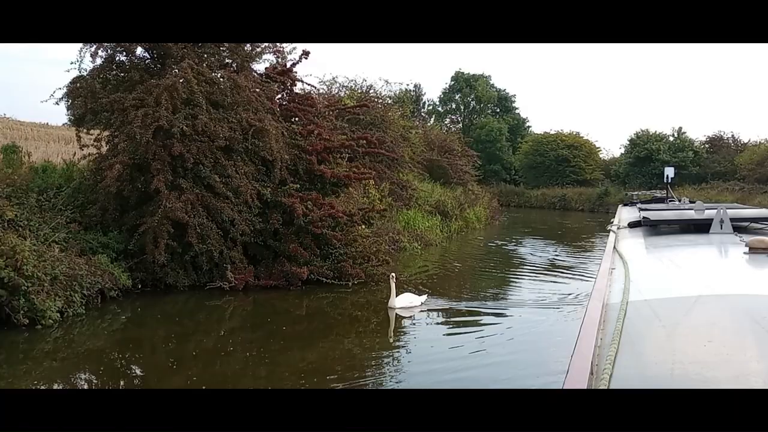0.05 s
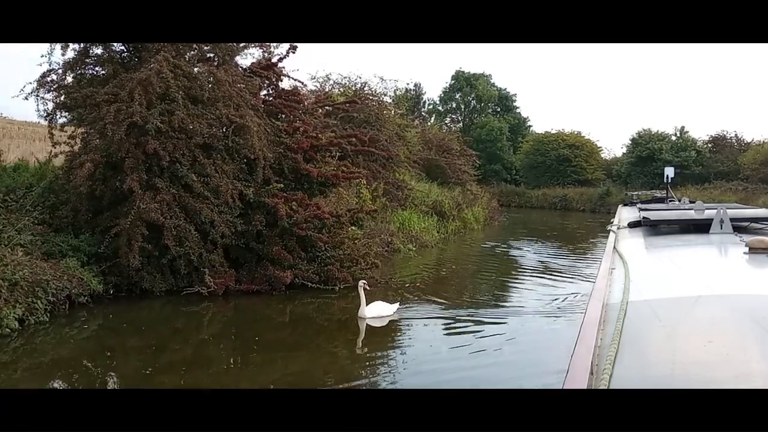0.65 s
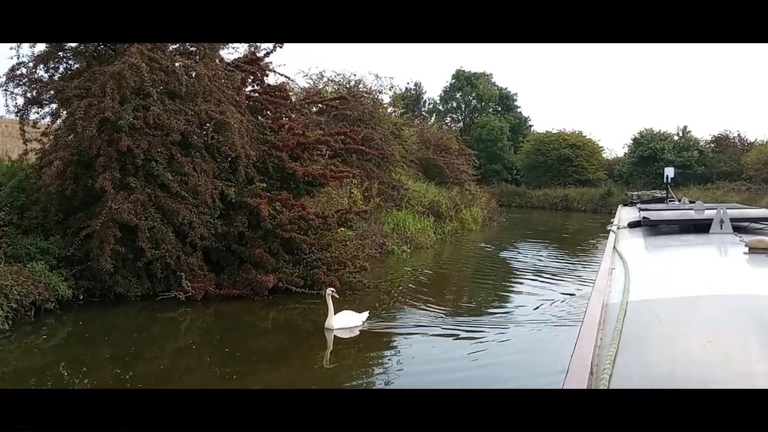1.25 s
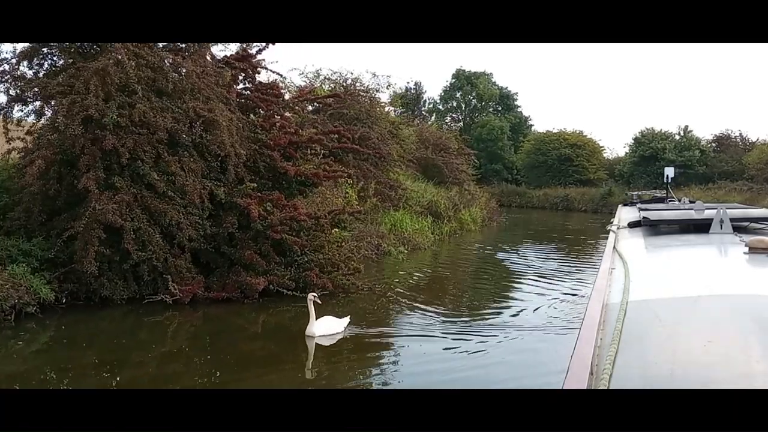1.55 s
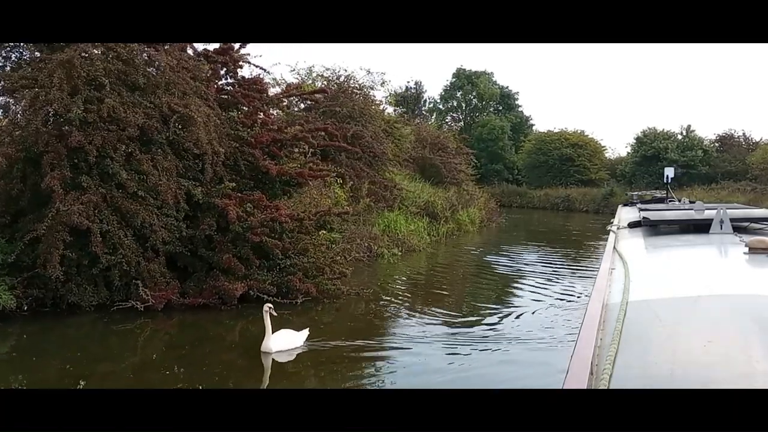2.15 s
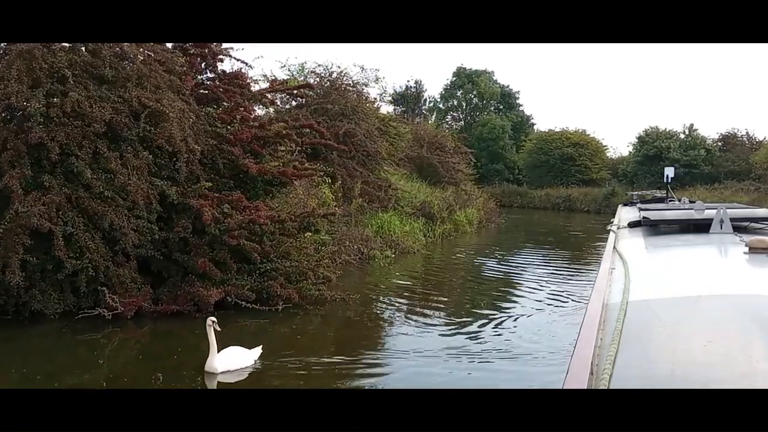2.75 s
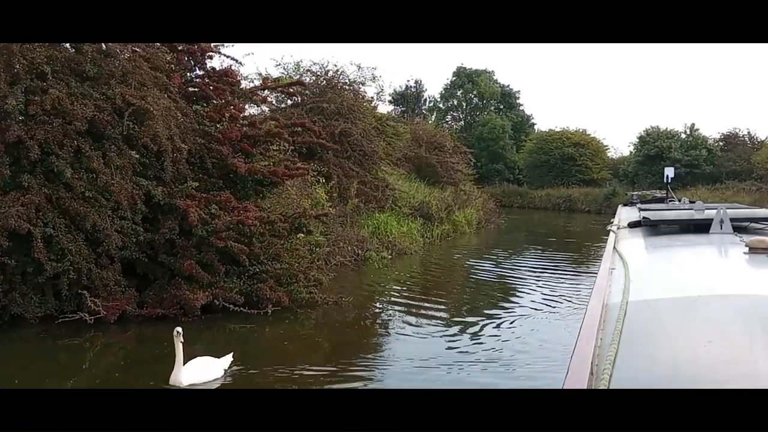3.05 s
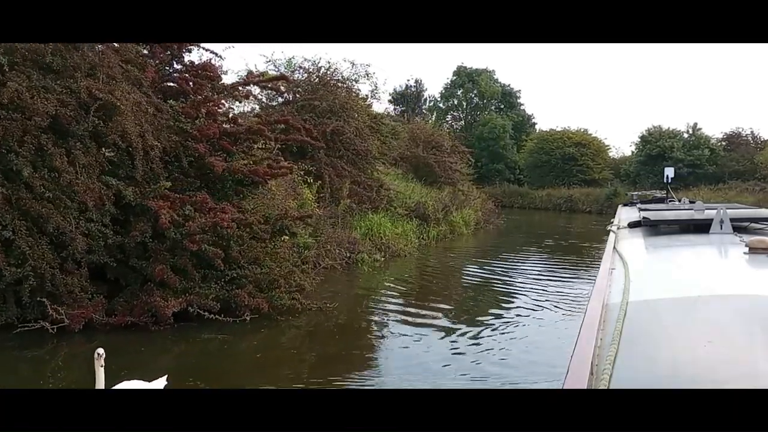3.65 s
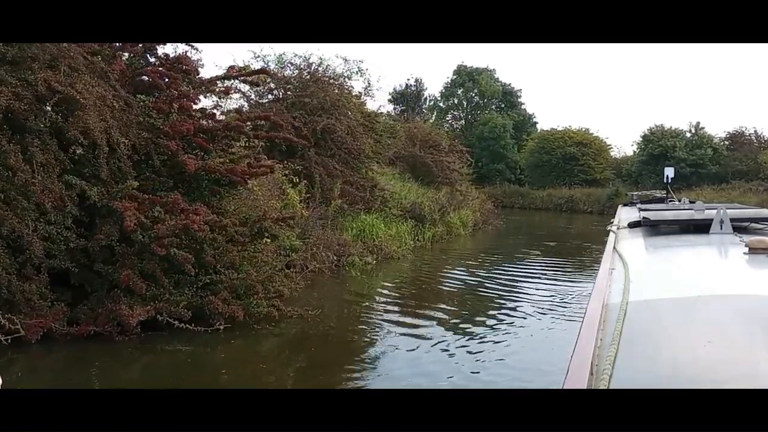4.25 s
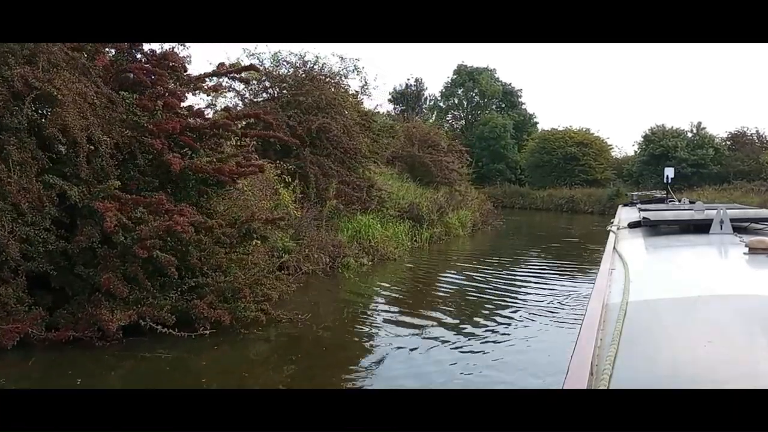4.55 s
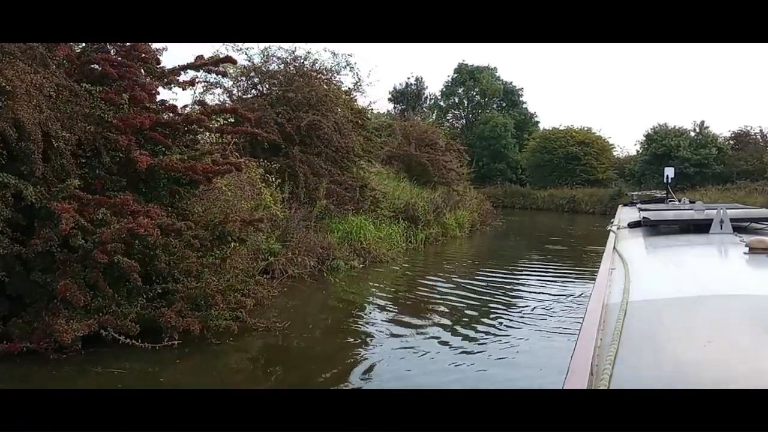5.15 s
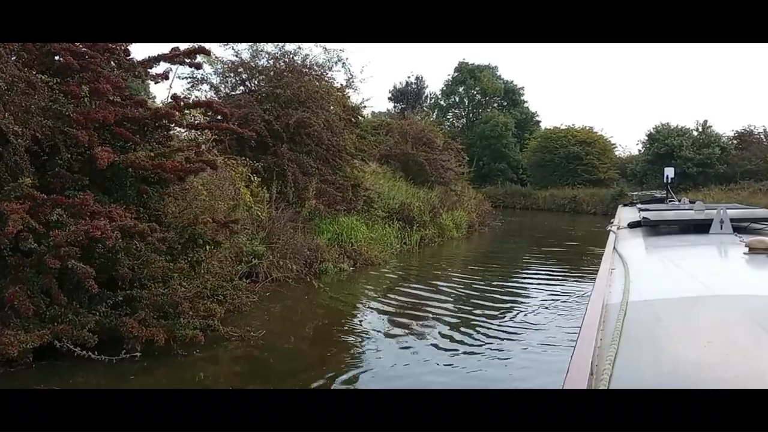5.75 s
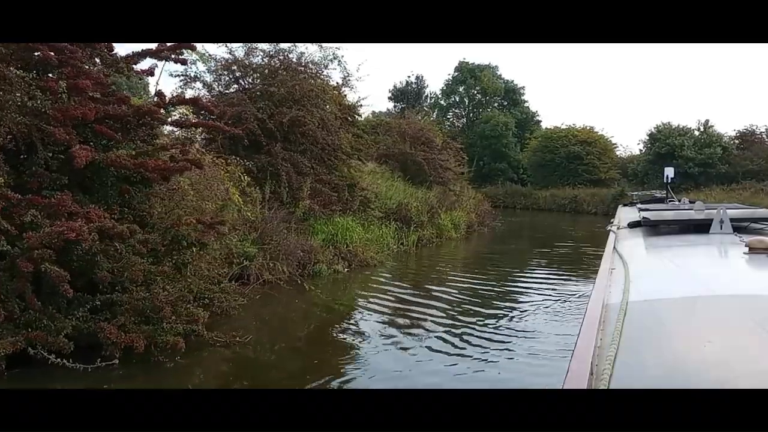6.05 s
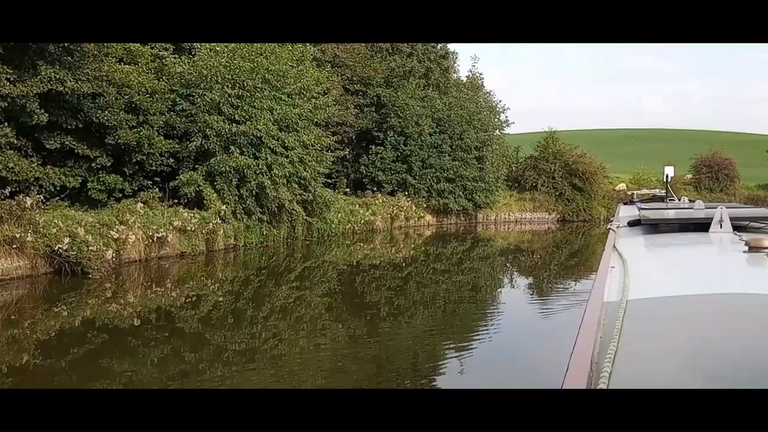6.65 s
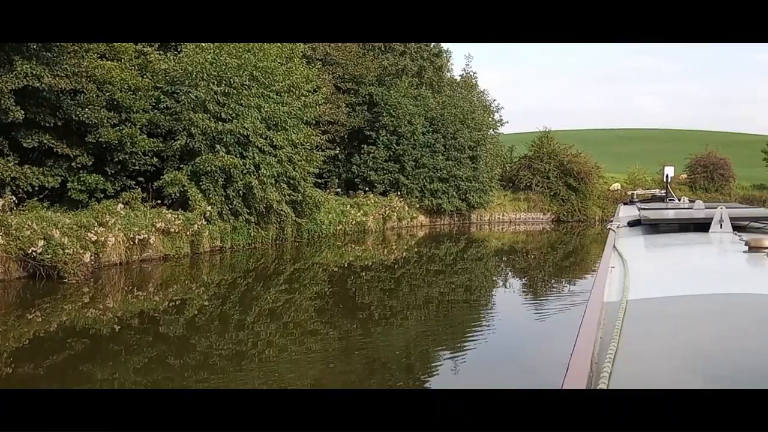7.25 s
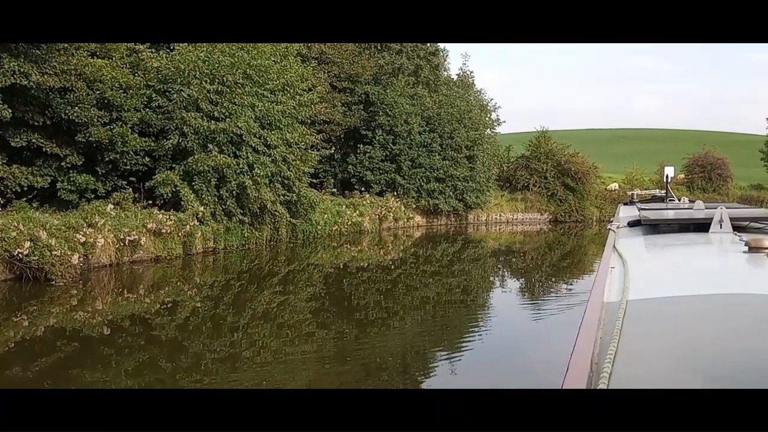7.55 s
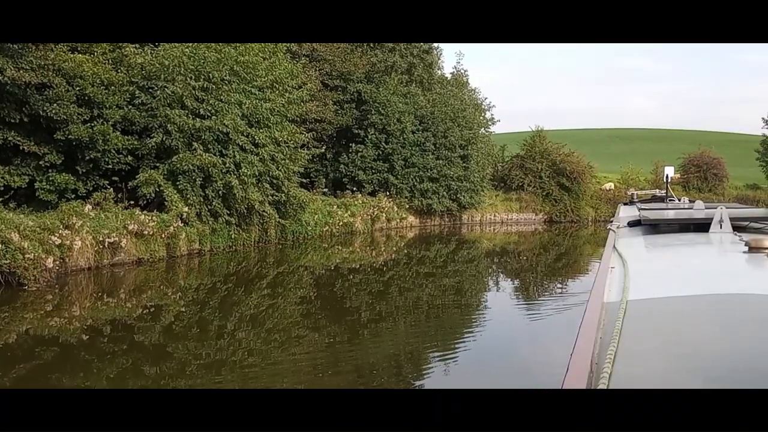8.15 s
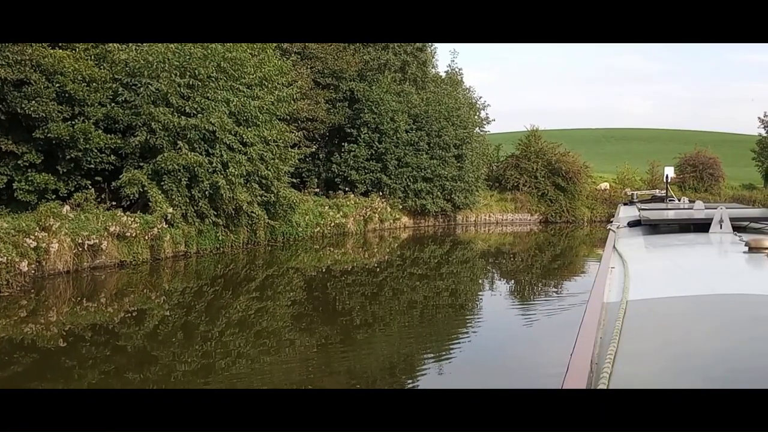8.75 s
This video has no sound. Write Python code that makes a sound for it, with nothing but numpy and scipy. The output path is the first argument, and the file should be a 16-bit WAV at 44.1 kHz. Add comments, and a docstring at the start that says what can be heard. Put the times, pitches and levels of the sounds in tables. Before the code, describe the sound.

Steady diesel chugging and rattling aboard a narrowboat, with light clinks and faint birdsong, cutting out briefly and fading back in.

```python
"""A narrowboat cruises a quiet canal, heard from the stern, its four-cylinder diesel at about 915 rpm.
From the start the exhaust and steel hull drone, pistons slap and clatter under the deck boards and a loose
fitting buzzes once a crank turn, over a faint water hiss. From 2 to 3.3 s metal clinks three times on deck,
and a small bird chirps once. At 6.6 s everything drops out, then fades back in with the exhaust a little
louder and the clatter brighter; the bird trills and chirps again, and the engine chugs on."""
import sys
import numpy as np
from scipy import signal
from scipy.fft import rfft, irfft, next_fast_len
from scipy.io import wavfile

SR = 44100
rng = np.random.default_rng(int(sys.argv[2]) if len(sys.argv) > 2 else 0)


def output_pcm(signal):
    """Save a mono or channel-first signal as 16-bit PCM at the path in sys.argv[1].

    Samples are clipped to [-1, 1] before scaling.
    """
    pcm = np.clip(np.atleast_2d(signal).T, -1, 1) * 32767
    wavfile.write(sys.argv[1], SR, np.round(pcm).astype(np.int16))


N = 392490
T = np.arange(N) / SR
HZ = np.fft.rfftfreq(next_fast_len(N), 1 / SR)
GAP_START_S, GAP_END_S = 6.598, 6.668
AFTER_GAP = T > GAP_END_S


# engine speed, hunting slightly on the governor: t/s, speed/rpm
CRANK_SPEED = [(0.0, 916.1), (0.5, 908.3), (0.9, 918.2), (2.05, 909.9), (2.6, 916.2), (3.35, 911.4),
               (3.95, 919.7), (4.5, 909.9), (5.05, 914.9), (5.6, 912.5), (6.15, 916.6), (8.1, 917.8),
               (8.6, 913.9)]
CYCLE_HZ = np.mean(CRANK_SPEED, axis=0)[1] / 120
def engine_cycle():
    """Count four-stroke cycles, two crank turns each; whole numbers fall on the heavy thump."""
    rpm = np.interp(T, *np.transpose(CRANK_SPEED))
    offset = np.interp(T, [GAP_START_S, GAP_END_S], [.407, .637])  # the beat skips ahead in the gap
    return np.cumsum(rpm / 120) / SR + offset


# exhaust note, from the 2nd multiple of the firing rate up: level/dB
EXHAUST_HARMONICS = [-53.5, -40, -48, -56, -66.5, -61, -72, -74, -62]
def exhaust_lines(count, lift_db=1.33):
    """Four firings a cycle hum on every fourth order; one row before the gap, a louder one after."""
    lines = np.zeros(count)
    lines[:4 * len(EXHAUST_HARMONICS):4] = amp(EXHAUST_HARMONICS)
    return np.array([lines, lines * amp(lift_db)])


# hull resonances: f/Hz, width/Hz, level before the gap/dB, level after/dB
HULL_MODES = [(134.4, 7, -61, -58), (170.3, 11.2, -51.5, -51.5), (188.5, 9.2, -53.5, -53.5),
              (213.7, 9, -54.5, -56), (227.2, 6.7, -55.5, -58), (319.3, 6.2, -50.5, -48.5),
              (351, 7.6, -60, -54.5), (396, 4.5, -62, -59.5), (426.5, 5.3, -69.5, -73),
              (479.2, 6.6, -63.5, -64.5)]
def hull_lines(hz):
    """The steel hull picks tones out of the engine's shaking; rows for before and after the gap."""
    return sum(amp(db)[:, None] * resonance(hz, centre, width) for centre, width, *db in HULL_MODES)


def drone(cycle, waver_db=-69, waver_hz=3):
    """One cylinder thumps hardest; the exhaust hums and the hull rings after that beat."""
    orders = np.arange(8, 65)  # multiples of the cycle rate
    hz = orders * CYCLE_HZ
    exhaust, hull = exhaust_lines(len(orders)), hull_lines(hz)
    before, after = np.hypot(exhaust, np.abs(hull)) * np.exp(1j * np.angle(exhaust + hull))
    waver = amp(waver_db) / np.hypot(np.abs(before), amp(waver_db))  # faint tones waver most
    # phase lags in turns: the deepest hum leads, higher tones reach the deck by unequal paths
    lead = .33 * (hz[0] / hz) ** 8
    paths = .16 * (hz / hz[-1]) * (orders > 16) * rng.standard_normal(len(orders))
    # bending waves travel at different speeds, drawing each thump out into a rounder throb
    dispersion = .011 * (orders - 24) ** 2 * (abs(orders - 24) < 8)
    lag = paths - lead + dispersion
    width = amp(side_db(hz) + 3)
    mid, side = 0, 0
    for i, order in enumerate(orders):
        wander = np.sqrt(1 - waver[i] ** 2) + waver[i] * walk(waver_hz)
        tone = np.exp(2j * np.pi * (order * cycle - lag[i]))
        line = np.where(AFTER_GAP, after[i], before[i]) * wander * tone
        mid = mid + line.real
        side = side + line.imag * rng.choice([-1, 1]) * width[i]
    return np.sqrt(2) * stereo(mid, side)


def knocks(cycle, count=480, jitter_s=5e-5, uneven_db=5, drift=.92, memory=.71, lope_db=-.27):
    """Pistons, valves, injectors and gears knock at the same angles each cycle, never quite alike."""
    angles = (np.arange(count) + rng.uniform(0, 1, count)) / count
    due = np.arange(-1, int(cycle[-1]) + 1)[:, None] + angles
    timing, force, play = rng.standard_normal((3,) + due.shape)
    # the play in each joint changes over several cycles
    play = signal.lfilter([np.sqrt(1 - memory ** 2)], [1, -memory], play, axis=0)
    lope = lope_db * np.cos(2 * np.pi * angles)  # one cylinder knocks harder than the rest
    sizes = (rng.choice([-1, 1], count) + drift * play) * amp(uneven_db * np.minimum(force, 2) + lope)
    times = np.interp(due, cycle, T, left=-1, right=-1) + jitter_s * timing
    at = np.round(times * SR).astype(int)
    heard = (at >= 0) & (at < N)
    return unit(np.bincount(at[heard], sizes[heard], N))


# tone of the clatter through the deck boards: f/Hz, level/dB per Hz
CLATTER_TONE = [(25, -91.5), (40, -90), (60, -80), (175, -73), (275, -80), (400, -80), (560, -86.5),
                (740, -86), (1150, -89), (1800, -93), (2600, -99), (3300, -107.5), (5000, -119.5),
                (8000, -129), (14000, -142)]
# brightening EQ on the clatter after the gap: f/Hz, gain/dB
CLATTER_LIFT = [(300, -0.5), (650, 0.5), (1000, 1), (1500, 0.5), (2200, -0.3), (4000, 1.5)]
def clatter(cycle, ring_s=.082):
    """The knocks ring the casing and deck boards and arrive from all round."""
    blows = knocks(cycle)
    body_db = slope(CLATTER_TONE, HZ) + panel_db()
    mid = colour(scatter(blows, ring_s), body_db)
    side = colour(scatter(blows, ring_s), body_db + side_db(HZ))
    both = stereo(mid, side)
    return np.where(AFTER_GAP, filtered(both, amp(slope(CLATTER_LIFT, HZ))), both)


# panel peaks and the hollows between them: f/Hz, width/Hz, gain/dB
PANEL_MODES = [(213, 61, 7.5), (554, 16, 4), (596, 11, -7), (661, 91, 5.5), (880, 47, 2), (883, 15, -4.5),
               (981, 250, 2), (1210, 79, -6), (1273, 47, 7), (1375, 56, 3.5), (1402, 35, -4.5),
               (1500, 34, -3), (1743, 78, 3.5), (1845, 60, 5), (2032, 116, 8.5), (2165, 24, 3.5),
               (2270, 72, -3.5), (2360, 110, 3.5), (2740, 200, 2.5), (4110, 110, 5), (4840, 160, 5.5),
               (5900, 320, 6), (6820, 330, 4.5)]
def panel_db():
    """Ringing panels act as an EQ on the clatter and the rattle."""
    return sum(db / (1 + (2 * (HZ - hz) / width) ** 2) for hz, width, db in PANEL_MODES)


# sustained casing modes: f/Hz, width/Hz, level before the gap/dB, level after/dB
CASING_MODES = [(628.6, 27, -64.5, -61.5), (711, 27, -72, -75), (795.6, 7.9, -70.5, -71.5),
                (872, 26, -69.5, -65.5), (996.5, 34, -68, -62.5), (1288, 28, -78.5, -84),
                (1339, 16, -71.5, -69.5), (1374, 56, -76, -74.5), (1880, 23, -77.5, -72),
                (2007, 40, -73, -77.5)]
def casing(cycle, waver=.36, waver_hz=2.8):
    """Every cycle strikes the casing again, so each mode rings on in the nearest engine orders."""
    near = np.arange(-4, 5)
    sidebands = np.exp(2j * np.pi * near[:, None] * cycle)
    out = 0
    for hz, width, before_db, after_db in CASING_MODES:
        order = round(hz / CYCLE_HZ)
        shares = 1 / (1 + (2 * ((order + near) * CYCLE_HZ - hz) / width) ** 2)
        mid = shares / np.linalg.norm(shares) * np.exp(2j * np.pi * rng.random(len(near)))
        side = mid * 1j * rng.choice([-1, 1], len(near)) * amp(side_db(hz))
        carrier = np.exp(2j * np.pi * order * cycle) * (1 + waver * walk(waver_hz))
        ring = stereo(mid, side) @ sidebands * carrier
        out = out + np.where(AFTER_GAP, amp(after_db), amp(before_db)) * ring.real
    return np.sqrt(2) * out


# ring of the engine block: f/Hz, t60/s, level/dB
BLOCK_MODES = [(875, .025, -63), (920, 0.03, -64), (1000, 0.022, -61), (1875, .04, -63.5),
               (1980, 0.065, -60)]
def piston_slap(cycle, uneven_db=3.5, surge_db=2):
    """A piston slaps once a crank turn and rings the block; its force surges and eases."""
    at = np.flatnonzero(np.diff(np.floor(2 * cycle + .2)))
    force_db = uneven_db * np.minimum(rng.standard_normal(len(at)), 1) + surge_db * walk(3).real[at]
    blows = np.zeros(N)
    blows[at] = amp(force_db)
    t = T[:SR // 4]
    ring = sum(amp(db) * decay(t, t60) * np.sin(2 * np.pi * (hz * t + rng.random((2, 1)) / 2))
               for hz, t60, db in BLOCK_MODES)
    attack = 1 - np.exp(-(t / .002) ** 2)  # each ring swells in over about two milliseconds
    return signal.fftconvolve(blows[None], attack * ring, axes=1)[:, :N]


# tone of the loose fitting: f/Hz, level/dB per Hz
RATTLE_TONE = [(800, -125), (2000, -111), (3000, -114), (4300, -116), (6000, -124), (8000, -134),
               (15000, -143)]
# accents of harder shaking, one shake an engine cycle: t/s, shakes, level/dB above the usual buzz
RATTLE_ACCENTS = [(.447, 1, 8), (1.83, 1, 7.5), (2.74, 1, 8), (3.01, 3, 6.5), (4.385, 2, 8.5),
                  (6.35, 1, 9.5), (6.914, 2, 9), (7.962, 1, 9)]
def rattle(cycle, shake_s=.023, ringing=.95):
    """A loose fitting buzzes briefly once a crank turn, now and then harder."""
    turn = 2 * cycle + .45
    nearest = np.round(turn).astype(int)
    size = amp(2.2 * np.clip(rng.standard_normal(400), -2, 1))[nearest]
    envelope = unit(size * np.exp(-.5 * ((turn - nearest) / .2) ** 2))
    for start, shakes, db in RATTLE_ACCENTS:
        for k in range(round(shakes)):
            shake = amp(db) * np.exp(-.5 * ((T - start - k / CYCLE_HZ) / shake_s) ** 2)
            envelope = np.maximum(envelope, shake)
    return colour(envelope * rng.standard_normal((2, N)), slope(RATTLE_TONE, HZ) + ringing * panel_db())


# clink cues: t/s, f/Hz, level/dB
CLINK_CUES = [(2.13, 2020, -68), (3.0, 2030, -53.5), (3.283, 2450, -59.5)]
def clinks(width_hz=480, t60_s=.17):
    """Something metal clinks on deck, ringing a tight cluster of modes that dies away quickly."""
    noise, out = rng.standard_normal((2, N)), 0
    for start, hz, db in CLINK_CUES:
        envelope = amp(db) * (T > start) * decay(np.abs(T - start), t60_s)
        out = out + envelope * unit(filtered(noise, resonance(HZ, hz, width_hz)))
    return out


# bird cues: t/s, notes, note length/s, top f/Hz, pitch dip/Hz, level/dB
BIRD_CUES = [(3.018, 1, .085, 7330, 400, -83), (6.866, 6, .041, 7720, 600, -75.5),
             (7.305, 1, .115, 7020, 60, -83)]
def bird(echo_db=-1, trees_t60_s=.36, throb=.25, buzz=.25):
    """Thin, buzzy calls from the bank swing down and up in pitch; the trees echo them."""
    song = np.zeros(N)
    for start, notes, note_s, top_hz, dip_hz, db in BIRD_CUES:
        progress = np.clip((T - start) / (round(notes) * note_s), 0, 1)
        swing = 2 * np.pi * progress * round(notes)
        hz = top_hz - dip_hz * (1 - np.cos(swing)) / 2 + buzz * dip_hz * walk(260, count=2400).real
        swell = np.sqrt(np.abs(np.sin(np.pi * progress)))
        tremolo = 1 + throb * np.sin(swing)  # louder on the way down
        song += amp(db) * swell * tremolo * np.sin(2 * np.pi * np.cumsum(hz) / SR)
    trees = rng.standard_normal((2, SR)) * decay(T[:SR], trees_t60_s)
    echo = signal.fftconvolve(song[None], trees / np.linalg.norm(trees[0]), axes=1)[:, :N]
    return song + amp(echo_db) * echo


# tone of the hiss bed: f/Hz, level/dB per Hz
HISS_TONE = [(300, -100), (1500, -105), (4000, -123), (8000, -124.5), (12000, -125), (15000, -120.5)]
def water_hiss():
    """A faint, steady bed of water and hiss, wide across both channels."""
    return colour(rng.standard_normal((2, N)), slope(HISS_TONE, HZ))


# stereo image of the engine: f/Hz, side minus mid level/dB
ENGINE_WIDTH = [(60, -22), (200, -21.5), (380, -10.5), (700, -3.5), (1290, 1.5), (2000, -2), (4400, 2),
                (15000, 4)]
def side_db(hz):
    """The engine's bass sits in the centre and its treble spreads wide."""
    return slope(ENGINE_WIDTH, hz)


def scatter(x, t60):
    """Many short paths smear a sound in time and leave a shallow comb in the treble."""
    tail = rng.standard_normal(N) * decay(np.minimum(T, 10 * t60), t60)
    paths = rfft(tail / np.linalg.norm(tail), next_fast_len(N))
    comb_depth = .55 * np.minimum(HZ / 3500, 1)
    return filtered(x, np.exp(1j * np.angle(paths)) * np.abs(paths) ** comb_depth)


def resonance(hz, centre_hz, width_hz):
    """A steep resonance that leads below its centre and lags above it."""
    detune = 2 * (hz - centre_hz) / width_hz
    return (1 - 1j * detune) / (1 + detune ** 2) ** 1.5


def walk(rate_hz, count=200):
    """Drift in level and phase, gliding between random points; rms near 1."""
    points = rng.standard_normal(count) + 1j * rng.standard_normal(count)
    return np.sqrt(3) / 2 * np.interp(T * rate_hz + rng.uniform(), np.arange(count), points)


def decay(t, t60):
    """Fall by 60 dB every t60."""
    return np.exp(-np.log(1000) * t / t60)


def amp(db):
    """Decibels to gain."""
    return 10 ** (np.asarray(db) / 20)


def unit(x):
    """Scale to rms 1."""
    return x / np.sqrt(np.mean(x ** 2))


def slope(points, hz):
    """Read an EQ curve of (f/Hz, level/dB) points on a log-frequency axis."""
    f, db = np.transpose(points)
    return np.interp(np.log(hz + 1), np.log(f), db)


def filtered(x, response):
    """Apply a response given on the HZ grid."""
    size = next_fast_len(N)
    return irfft(rfft(x, size) * response, size)[..., :N]


def colour(x, db):
    """Give a white signal of rms 1 a spectrum in dB per Hz."""
    return filtered(x, amp(db) * np.sqrt(SR / 2))


def stereo(mid, side):
    """Left and right from mid and side."""
    return np.array([mid + side, mid - side])


def scene(pan_db=1.1):
    """One four-stroke cycle drives every engine layer; the mix leans a little to the right."""
    cycle = engine_cycle()
    engine = drone(cycle) + casing(cycle) + clatter(cycle) + piston_slap(cycle) + rattle(cycle)
    balance = amp(np.array([[-pan_db], [pan_db]]) / 2)
    return (engine + clinks() + water_hiss() + bird()) * balance


def record(dry, fade_out_s=.002, fade_in_s=.265, top_hz=15750):
    """The mix drops to a short gap of silence and fades back in; a steep low-pass trims the top."""
    fade_out = np.clip((GAP_START_S - T) / fade_out_s, 0, 1)
    fade_in = np.clip((T - GAP_END_S) / fade_in_s, 0, 1)
    lowpass = signal.ellip(10, .2, 80, top_hz, fs=SR, output="sos")
    return signal.sosfilt(lowpass, dry * (fade_out + fade_in))


dry = scene()
out = record(dry)
output_pcm(out)
```